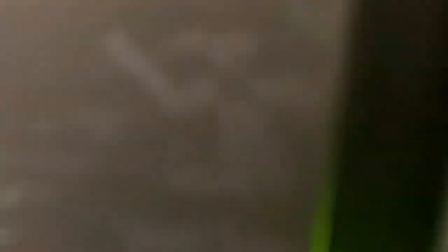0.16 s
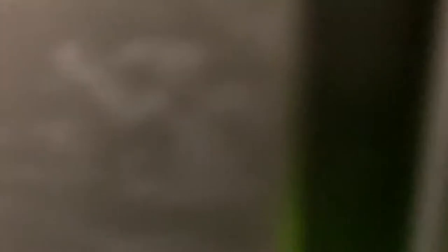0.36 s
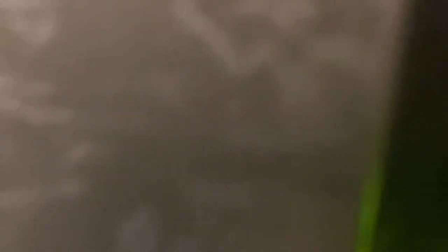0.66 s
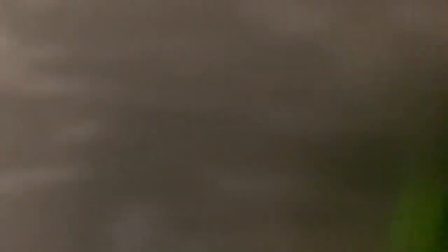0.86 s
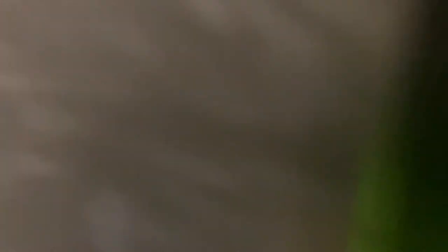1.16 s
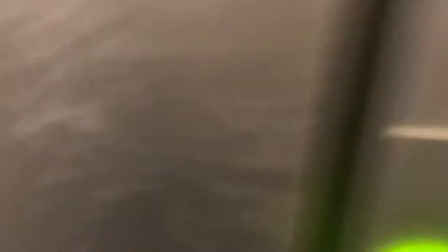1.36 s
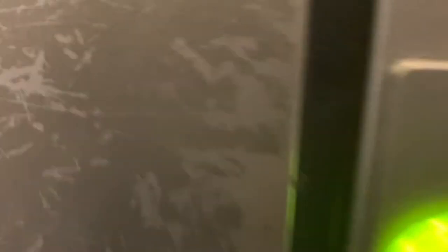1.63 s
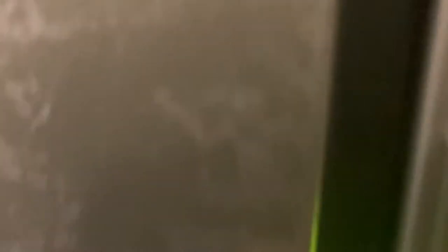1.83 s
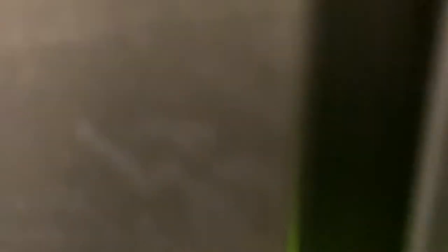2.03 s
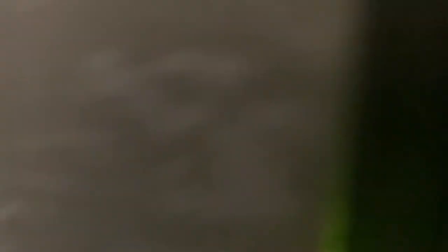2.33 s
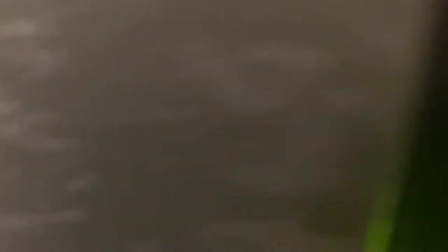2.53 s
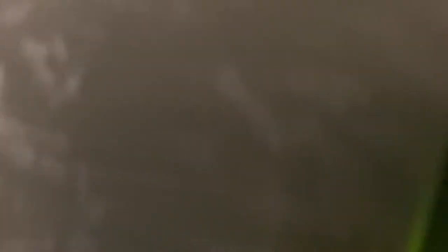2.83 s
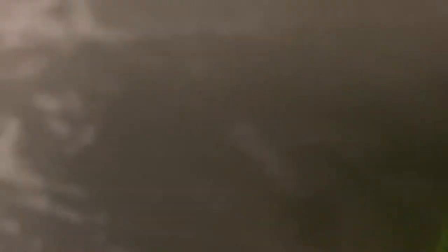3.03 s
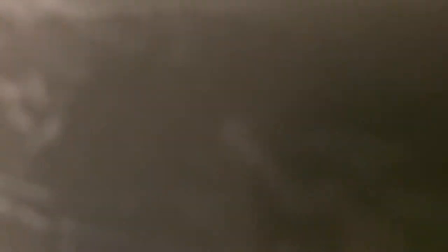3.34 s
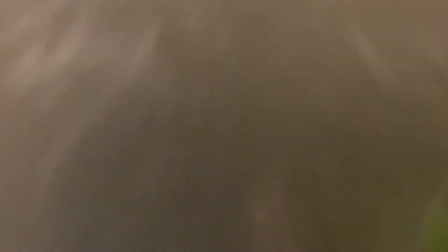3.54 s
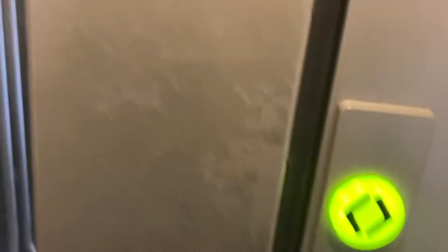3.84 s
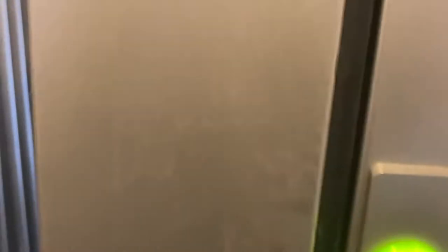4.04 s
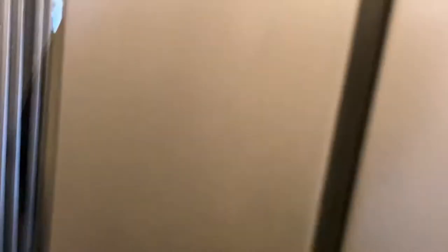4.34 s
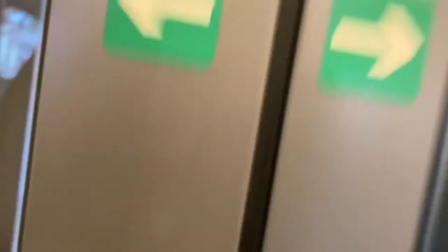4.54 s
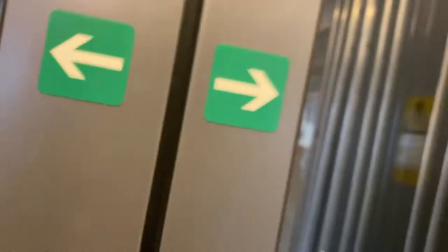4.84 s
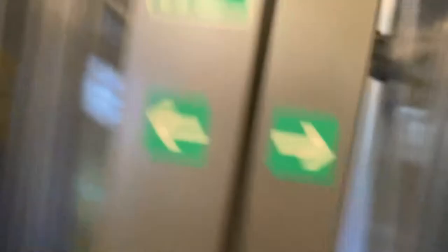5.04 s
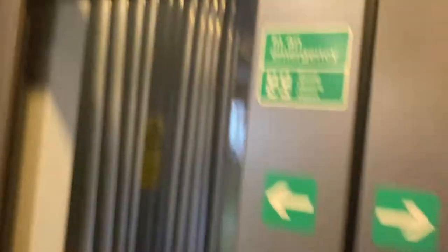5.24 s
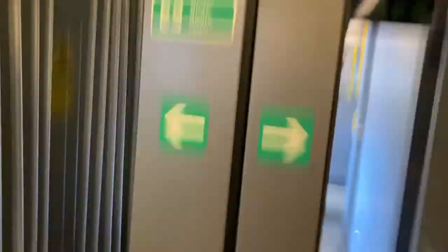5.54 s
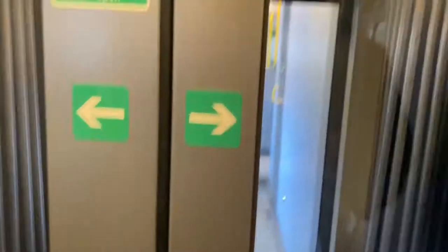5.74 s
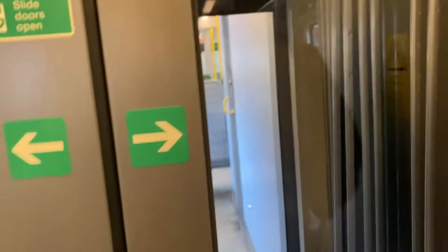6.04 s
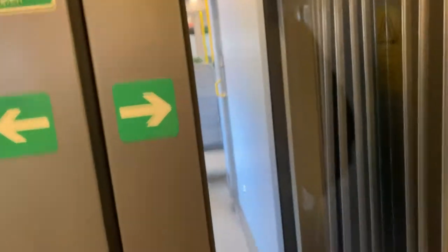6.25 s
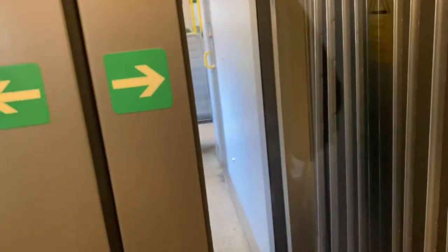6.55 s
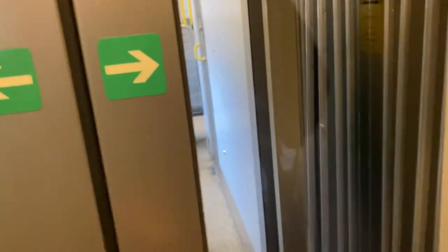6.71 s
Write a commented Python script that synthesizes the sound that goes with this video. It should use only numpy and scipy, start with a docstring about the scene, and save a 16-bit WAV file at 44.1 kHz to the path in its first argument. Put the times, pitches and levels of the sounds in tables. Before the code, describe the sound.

Inside a moving train, wheels rumble under occasional clicks until a sliding door jolts open to dense rubbery crackling and light hiss.

```python
"""A low rumble of train wheels comes through the floor, with the hum of the carriage, air and fans.
This is the small steel vestibule at the end of a moving passenger carriage, heard by a hand-held phone.
Door leaves click and knock in their tracks. After about four seconds the gangway door slides back:
more hiss comes in, and the rubber bellows creak, snap and crackle as their folds stick and slip."""
import sys
import numpy as np
from scipy import signal
from scipy.fft import rfft, irfft, next_fast_len
from scipy.io import wavfile
from scipy.ndimage import uniform_filter1d, map_coordinates

SR = 44100
rng = np.random.default_rng(int(sys.argv[2]) if len(sys.argv) > 2 else 0)


def transcribe(u):
    """Save the signal u as a 16-bit wav file named by the first command-line argument.

    u: samples, shape (n,) or (channels, n), limited to [-1, 1]; the rate is SR.
    q: integer samples, one column per channel.
    """
    v = np.clip(np.atleast_2d(u).T, -1, 1)
    q = np.round(v * 32767).astype(np.int16)
    wavfile.write(sys.argv[1], SR, q)


N = 303408
TIME_S = np.arange(N) / SR


def amp(db):
    """Turn decibels into a gain."""
    return 10 ** (np.asarray(db) / 20)


def unit(x):
    """Scale a signal to an average (rms) level of 1."""
    return x / np.sqrt(np.mean(x ** 2) + 1e-20)


def along(points, hz):
    """Read a table between its pitches, on an octave scale."""
    pitches, values = np.transpose(points)
    return np.interp(np.log(hz + 1), np.log(pitches + 1), values)


def curves(rows):
    """Join timed rows into one curve for each column after the time."""
    times, *columns = np.transpose(rows)
    return [np.interp(TIME_S, times, column) for column in columns]


def wobble(rate):
    """A smooth curve through `rate` random values a second."""
    coarse = np.arange(0, N + 32, 32)
    values = rng.standard_normal(int(N * rate / SR) + 4)
    return np.interp(np.arange(N), coarse, map_coordinates(values, [coarse * rate / SR]))


def filtered(x, response):
    """Multiply each frequency of x by response(hz)."""
    size = next_fast_len(N + SR // 2)
    return irfft(rfft(x, size) * response(np.fft.rfftfreq(size, 1 / SR)), size)[..., :N]


def band(x, lo_hz, hi_hz):
    """Keep one range of pitches, boosted so that white noise holds its level."""
    passed = signal.sosfilt(signal.butter(3, [lo_hz, hi_hz], "bandpass", fs=SR, output="sos"), x)
    return passed * np.sqrt(SR / 2 / (hi_hz - lo_hz))


# How alike left and right are: pitch_hz, likeness (0 to 1)
STEREO_LIKENESS = [(60, 0.97), (300, 0.9), (600, 0.66), (1000, 0.19), (1500, 0), (16000, 0)]
def rush(tone, patchy_db):
    """Noise from all around, shaped by a tone table, with random louder and softer patches."""
    noise = signal.stft(rng.standard_normal((2, N)), nperseg=512)[2]
    patches = uniform_filter1d(rng.standard_normal(noise.shape[1:]), size=6, axis=0)
    patches = uniform_filter1d(patches, size=10, axis=1)
    pair = signal.istft(noise * amp(patchy_db * unit(patches)), nperseg=512)[1][:, :N]
    width = lambda hz: np.arccos(along(STEREO_LIKENESS, hz)) / 2
    mid, side = filtered(pair, lambda hz: amp(along(tone, hz)) * [np.cos(width(hz)), np.sin(width(hz))])
    return unit(np.array([mid + side, mid - side]))


def door_blend():
    """An angle for fading from shut (0) to open (pi / 2) as the gangway door slides back."""
    start_s, end_s = 4.33, 5.29
    return np.interp(TIME_S, (start_s, end_s), [0, np.pi / 2])


# Tone of the wheels: pitch_hz, relative_db
WHEEL_TONE = [(13, -68), (25, -38), (40, -6), (65, 4), (90, 4.5), (124, -7.5), (150, -41), (200, -49),
              (330, -120)]
def wheel_rumble(level_db):
    """Rolling wheels rumble unevenly through the floor."""
    return amp(level_db + 2.6 * wobble(9.7)) * rush(WHEEL_TONE, patchy_db=0)


# Tone of the carriage body with the gangway shut, and open: pitch_hz, relative_db
BODY_SHUT_TONE = [(71, -6), (120, -3), (194, -2.5), (274, -9.5), (385, -3), (421, -5), (480, -11),
                  (504, -17.5), (541, -13), (653, -16.5), (806, -28.5), (1030, -25.5), (1300, -33.5),
                  (1690, -100), (2860, -120)]
BODY_OPEN_TONE = [(71, -17), (120, -1.5), (216, -16.5), (269, -15), (328, -26), (389, -14.5), (456, -9),
                  (926, -35), (1000, -39), (1300, -32), (1690, -47), (2860, -120)]
def body_drone(level_db):
    """The carriage body drones, changing tone as the gangway opens."""
    shut = np.cos(door_blend()) * rush(BODY_SHUT_TONE, patchy_db=2)
    opened = np.sin(door_blend()) * rush(BODY_OPEN_TONE, patchy_db=1.5)
    return amp(level_db + 0.89 * wobble(24)) * (shut + opened)


# Rise and fall of the ride noise: time_s, wheel_db, body_relative_db
RIDE_LEVELS = [(0.0, -32, -42), (0.77, -37.5, -40.5), (0.96, -29.5, -40), (1.28, -39, -46.5),
               (1.63, -36.5, -45.5), (1.84, -31, -40.5), (2.11, -41, -44), (2.28, -39.5, -45.5),
               (2.53, -37.5, -45), (2.91, -36.5, -41.5), (3.45, -35.5, -42), (3.62, -27.5, -40.5),
               (3.85, -37, -44.5), (4.85, -35, -43.5), (5.23, -37.5, -43), (5.75, -36.5, -44.5),
               (6.34, -36, -45), (6.59, -37.5, -45), (6.88, -33.5, -49)]
def ride():
    """Wheels and body swell and ease as the train runs."""
    wheel_db, body_db = curves(RIDE_LEVELS)
    return wheel_rumble(wheel_db) + body_drone(body_db + 3)


# Tone of the air: pitch_hz, relative_db
AIR_TONE = [(600, -4.5), (900, -9.5), (1500, -6.5), (2000, -6), (2380, -7), (2550, -6.5), (2780, -5.5),
            (3000, -12), (4000, -13), (6000, -16), (9000, -18.5), (12000, -15), (14000, -39), (15600, -28),
            (16200, -58)]
# Strength of the draught: time_s, relative_db
DRAUGHT_LEVELS = [(0.0, -64), (0.77, -62.5), (1.46, -61.5), (1.73, -57.5), (1.96, -65), (2.28, -64),
                  (3.2, -63), (3.37, -60.5), (3.6, -60), (4.2, -63.5)]
def air_hiss():
    """A draught hisses softly."""
    return amp(curves(DRAUGHT_LEVELS)[0] + 4 + 0.33 * wobble(5)) * rush(AIR_TONE, patchy_db=2)


# Notes of the fans: pitch_hz, level_db
FAN_NOTES = [(391, -54), (560, -61.5), (656.8, -60.5), (888.2, -68), (1040, -68.5), (1190, -69.5)]
def fan_hum():
    """Fans hum on a few notes that waver slightly, differently left and right."""
    out = np.zeros((2, N))
    for hz, db in FAN_NOTES:
        level = amp(db + 0.83 * np.array([wobble(23), wobble(7.7)]))
        phase = 2 * np.pi * hz * TIME_S + 450 / hz * wobble(11)
        out += level * np.sin(phase + [[0], [hz / 700]])
    return out


# Notes of the electrical gear: pitch_hz, level_db
POWER_NOTES = [(1997, -77), (2300, -86.5), (2498, -69.5), (2590, -76), (2998, -80)]
def power_whine():
    """The power gear gives a faint, high, wavering whine."""
    out = np.zeros((2, N))
    for hz, db in POWER_NOTES:
        level = amp(db + 2 * np.array([wobble(4), wobble(4)]))
        out += level * np.sin(2 * np.pi * hz * TIME_S + wobble(8) / 2)
    return out


def judder(rate):
    """Stick and slip: a gain that jumps about `rate` times a second and quickly sinks again."""
    slips = (rng.random(N + SR) < rate / SR) * amp(4.3 * np.minimum(rng.exponential(size=N + SR), 2.6))
    sink = amp(-60 * np.arange(SR // 20) / SR / .012)
    return unit(signal.fftconvolve(slips, sink)[:N])


# Timing shared by all snaps. Here and below, fade_s is the time to die away by 60 dB.
LEAD_SAMPLES, RISE_S = SR // 50, 0.0008
SNAP_TIME_S = (np.arange(SR // 8) - LEAD_SAMPLES) / SR
SNAP_RISE, AFTER_PEAK_S = np.clip(SNAP_TIME_S / RISE_S, 0, 1), np.maximum(SNAP_TIME_S - RISE_S, 0)
def crack(fade_s=0.0035):
    """Stuck surfaces break free with a tiny burst of noise."""
    noise = rng.standard_normal((3, len(SNAP_TIME_S)))  # shared, left, right
    burst = SNAP_RISE ** 3 * amp(-60 * AFTER_PEAK_S / fade_s) * (noise[0] + 0.7 * noise[1:])
    burst[:, LEAD_SAMPLES + round(RISE_S * SR) + np.arange(2)] += [8, -3]  # the break itself
    return 1.83 * burst / np.linalg.norm(burst)


def scrape(fade_s):
    """The surfaces start to creep just before the crack, then slide to a stop."""
    creep = amp(-12 + 60 * np.minimum(SNAP_TIME_S, 0) / 0.01) * (1 - SNAP_RISE)
    slide = SNAP_RISE * amp(-60 * (AFTER_PEAK_S / max(fade_s, .01)) ** 1.12)  # holds, then stops short
    return (creep + slide) * rng.standard_normal((2, len(SNAP_TIME_S)))


# Notes the frame rings with: pitch_hz, relative_db, fade_s
FRAME_NOTES = [(540, 7.5, 0.035), (904, -6, 0.02), (1305, 0, 0.015), (1728, -4, 0.014), (1857, -2.5, 0.014),
               (2220, -1.5, 0.013), (2810, -9.5, 0.012), (3700, -9, 0.0068), (4240, -1.5, 0.011),
               (4776, 1.5, 0.0073), (5940, -4, 0.0034), (6900, -4, 0.009), (7400, -1, 0.011)]
def frame_ring(favoured_hz, shares_db):
    """A snap makes the frame ring briefly, most strongly near one favoured pitch."""
    hz, db, fade_s = np.transpose(FRAME_NOTES)
    strike_db = np.interp(hz, [1500, 3500, 8000], shares_db) - 18 * np.abs(np.log2(hz / favoured_hz))
    strike_db += 2.5 * rng.standard_normal(len(hz))
    hz = hz * (1 + .012 * rng.standard_normal(len(hz)))  # the folds sit differently each time
    notes = np.sin(2 * np.pi * hz[:, None] * np.maximum(SNAP_TIME_S, 0))
    ring = SNAP_RISE * (amp(db + strike_db) @ (amp(-60 * AFTER_PEAK_S / fade_s[:, None]) * notes))
    lag = round(rng.normal(0, .0003) * SR)  # each comes from its own direction
    return np.array([ring, np.roll(ring, lag)])


# Door clicks and bellows snaps (levels are relative):
# start_s, level_db, dull_db, bright_db, favoured_hz, scrape_db, scrape_fade_s, left_over_right_db
CLICKS_AND_SNAPS = [(0.312, -41, -4, -8.5, 1490, -17.5, 0.058, 3),
                    (0.441, -42.5, -18, -11, 816, -13.5, 0.094, -1),
                    (0.836, -19, -37, -2, 6740, -30, 0.068, -3),
                    (0.9305, -9.5, -11, -11, 4760, -19, 0.02, 4),
                    (0.9318, -27, 3.5, -20, 900, -29, 0.033, -2),
                    (0.9359, -24.5, 2.5, 7, 1700, -46, 0.023, -1.5),
                    (0.9424, -28, -18, -9, 7100, -24, 0.03, -1),
                    (1.254, -53.5, -20, -2.5, 5800, -16, 0.047, -2),
                    (1.276, -43, -14, -12, 802, -15, 0.07, -5),
                    (1.3481, -24, -13, -6, 3800, -21.5, 0.067, -1),
                    (1.6261, -21, -14.5, -9.5, 3550, -16.5, 0.031, -4),
                    (2.0193, -48, -12, -10, 1180, -16.5, 0.074, 1),
                    (3.032, -53, 3, -0.5, 914, -17, 0.054, 4),
                    (3.2024, -13.5, -2, -6.5, 4600, -15.5, 0.0076, 0.5),
                    (3.2202, -34, -3, -20, 1260, -23, 0.046, -2),
                    (3.3842, -52.5, -1, -22, 1020, -8.5, 0.056, 1.0),
                    (3.4225, -32, -1.5, -7.5, 940, -19.5, 0.043, -4),
                    (3.488, -43, 2, -16, 990, -30, 0.043, -3), (3.58, -57, 4, -16, 1000, -23, 0.044, -8),
                    (3.8096, -17, -12, -6.5, 2100, -18, 0.041, 0.5),
                    (4.367, -37, -9, -5.5, 1030, -11.5, 0.15, -4),
                    (4.3968, -12.5, -7, -9, 1210, -15, 0.067, 0),
                    (4.4257, -25.5, 1.5, -11, 1260, -15, 0.19, -3),
                    (4.4993, -14, -11, -5.5, 1930, -13.5, 0.032, -1),
                    (4.5313, -14.5, -15, -11, 1000, -9.5, 0.052, -2.5),
                    (4.5549, -13.5, -16.5, -8.5, 1920, -10, 0.05, 0.5),
                    (4.5612, -12, -10.5, -4.5, 3600, -13.5, 0.067, -1.5),
                    (4.615, -21, -7, -17, 3640, -18, 0.081, 0),
                    (4.6372, -20.5, 0, -7, 925, -22.5, 0.041, -6.5),
                    (4.66, -30.5, -1, -9, 1850, -16, 0.06, 0),
                    (4.678, -20.5, -13, -8.5, 885, -20.5, 0.07, -4),
                    (4.707, -15, -20, -9.5, 4200, -24, 0.099, 1),
                    (4.7486, -23, -11, -2.5, 864, -16, 0.11, -3),
                    (4.768, -18, -11, -21, 1730, -24, 0.071, 0),
                    (4.7854, -5.5, -13, -13, 2650, -19.5, 0.046, -3),
                    (4.8334, -18.5, -26, -9, 1460, -14.5, 0.044, 0),
                    (4.8613, -13.5, -4.5, -16, 2930, -29, 0.071, -6.5),
                    (4.881, -21, -9, -8.5, 1560, -15, 0.16, -2),
                    (4.9074, -17, -18, -9.5, 1260, -14, 0.047, -2),
                    (4.9706, -22, -3.5, -8.5, 1620, -13.5, 0.11, -0.5),
                    (4.9785, -30, -12, -2, 3600, -16, 0.046, 4),
                    (5.002, -20, -15, -8.5, 1280, -18, 0.068, -2),
                    (5.053, -38, -16, -2, 6630, -14, 0.054, -2),
                    (5.0745, -26, -12, -12, 4650, -15.5, 0.12, -2),
                    (5.096, -37, -20, -5, 5900, -15.5, 0.04, 0),
                    (5.1122, -26.5, -8.5, -11, 2800, -11, 0.043, -5),
                    (5.1493, -30, -8, -18, 4540, -12, 0.051, 8),
                    (5.1609, -26.5, -7, -10, 3300, -15.5, 0.15, -13),
                    (5.1734, -14.5, -5, -7, 2060, -19, 0.075, 0),
                    (5.211, -37.5, 1, -21, 1580, -14, 0.05, -2),
                    (5.267, -26, -3.5, -8.5, 1990, -12, 0.066, 0),
                    (5.281, -28.5, -19, -11, 5270, -10.5, 0.077, -5),
                    (5.314, -35, -10, -7, 1900, -14, 0.05, 2), (5.3637, -40, -23, -6, 6740, -14, 0.038, 0),
                    (5.374, -35, -7, -16, 2000, -18, 0.04, 0),
                    (5.3892, -21.5, -6, -7, 2260, -18.5, 0.13, -3),
                    (5.4248, -31, -22, -7, 2730, -11.5, 0.052, -1),
                    (5.468, -27.5, -4.5, -7.5, 2290, -11, 0.051, -2.5),
                    (5.4865, -32.5, -6, -10, 1280, -11.5, 0.072, 1),
                    (5.535, -37.5, -1, -4, 2250, -19, 0.036, -6),
                    (5.5586, -31, -5.5, -11, 1950, -13, 0.036, 1),
                    (5.5737, -30.5, -11, -12, 829, -16.5, 0.18, 1),
                    (5.599, -31, -7, -16, 3600, -9, 0.078, -1),
                    (5.608, -19.5, -6.5, -22, 1480, -20, 0.1, 0),
                    (5.6138, -13, -10, -8, 3570, -17.5, 0.13, 0.5),
                    (5.6383, -16, -9, -2, 4460, -19, 0.038, -1.5),
                    (5.648, -24, -8, -21, 1900, -15, 0.05, -4),
                    (5.675, -25.5, -10, -14, 1670, -15, 0.05, 2),
                    (5.684, -27.5, -5.5, -7, 1900, -19, 0.072, -1),
                    (5.7208, -33, -5, -20, 1290, -16, 0.03, 0),
                    (5.7258, -38.5, -14, -6.5, 1230, -2.5, 0.075, 0),
                    (5.7638, -20.5, -7, -18, 5900, -15.5, 0.073, -3),
                    (5.773, -21.5, -11, -9.5, 1890, -22, 0.15, -6.5),
                    (5.824, -21, -13.5, -17, 1490, -21, 0.043, -1),
                    (5.8464, -10, -11, -8.5, 2400, -18, 0.063, -1),
                    (5.875, -32, -2.5, -12, 2250, -11, 0.072, -2),
                    (5.901, -17, -16, -5.5, 2120, -16, 0.088, 1),
                    (5.957, -30, -15, -14, 4900, -7.5, 0.043, -4),
                    (5.9646, -21.5, -5.5, -4.5, 2420, -21, 0.022, 5),
                    (6.0352, -33, -8, -22, 2800, -17, 0.054, -2),
                    (6.056, -41.5, -3, -17, 1260, -11, 0.072, -1),
                    (6.0844, -14, -20, -8, 3100, -21, 0.13, -1),
                    (6.117, -19.5, -15, -9, 1690, -17.5, 0.084, -3),
                    (6.134, -21.5, -20, -3, 2840, -21, 0.063, 3),
                    (6.1453, -22.5, -2.5, -14, 1620, -14.5, 0.033, 0),
                    (6.1599, -16.5, -16, -8, 2360, -26, 0.028, 5),
                    (6.1746, -18.5, -19, -7, 1950, -20.5, 0.057, 3),
                    (6.1863, -27, -3.5, -16, 1400, -19, 0.19, 1),
                    (6.208, -31.5, -5, -13.5, 1630, -13.5, 0.069, -7),
                    (6.252, -38.5, -3, -20, 1380, -11.5, 0.13, 2),
                    (6.263, -36, -1, -20, 2200, -14, 0.08, -2), (6.289, -36, -3, -20, 1900, -16, 0.08, 0),
                    (6.333, -35, -1, -18, 2010, -26, 0.04, 1), (6.3608, -32, -12, -19, 2020, -22, 0.04, 7),
                    (6.3965, -21, -15, -9.5, 2160, -20.5, 0.049, 0.5),
                    (6.438, -20.5, -4.5, -15, 2280, -12.5, 0.036, 0.5),
                    (6.457, -25.5, -18, -8, 5900, -10, 0.054, 1),
                    (6.5185, -40, -15, -17, 2300, -9, 0.036, -3),
                    (6.542, -33.5, -5, -10, 2440, -17.5, 0.034, 2),
                    (6.6165, -17.5, -2, -9.5, 2020, -13.5, 0.021, -1),
                    (6.713, -47, 3, -12, 2300, -17, 0.04, 4),
                    (6.8115, -21.5, -10, -0.5, 1120, -23, 0.051, 3),
                    (6.8319, -16.5, -14, -14.5, 2200, -18, 0.041, -4)]
def snaps():
    """Each click or snap is a crack and a juddering scrape in four pitch ranges, plus the frame's ring."""
    parts = np.zeros((5, 2, N + SR))
    grip = np.pad(judder(rate=350) * 0.83 + 0.56, (0, SR))
    for start_s, db, dull_db, bright_db, favoured_hz, scrape_db, fade_s, pan_db in CLICKS_AND_SNAPS:
        first = round(start_s * SR) - LEAD_SAMPLES
        span = slice(first, first + len(SNAP_TIME_S))
        snap = crack() + amp(scrape_db) * grip[span] * scrape(fade_s)
        sides = amp(db + np.array([[pan_db / 2], [-pan_db / 2]]))
        shares_db = [dull_db + 9.5, 0, bright_db + 9.5]  # dull, middle, bright
        low_db = shares_db[0] - 4 * max(np.log2(favoured_hz / 1000), 0)  # higher snaps have less bass
        parts[:4, :, span] += amp([low_db, *shares_db])[:, None, None] * sides * snap
        parts[4, :, span] += sides * frame_ring(favoured_hz, shares_db)
    low, dull, middle, bright, rings = parts[..., :N]
    return amp(2) * (amp(-4.5) * band(low, 305, 1200) + amp(-4) * band(dull, 1270, 2590)
                     + band(middle, 2640, 7310) + band(bright, 6235, 12240) + amp(-5.5) * rings)


# Low knocks through the floor and door: start_s, level_db, pitch_hz, swell_s, fade_s
PANEL_KNOCKS = [(0.319, -20.5, 165, 0.0067, 0.097), (0.667, -19, 164, 0.0016, 0.029),
                (0.9312, -13.5, 478, 0.00091, 0.023), (0.9322, -14.5, 847, 0.00036, 0.017),
                (0.932, -12, 176, 0.0015, 0.05), (1.094, -12.5, 185, 0.0028, 0.028),
                (1.85, -21, 176, 0.004, 0.045), (1.894, -15.5, 169, 0.0028, 0.035),
                (3.203, -17, 204, 0.00025, 0.022), (3.204, -16, 515, 0.00056, 0.02),
                (3.581, -22, 142, 0.005, 0.11), (4.399, -14, 200, 0.0059, 0.046),
                (4.423, -8.5, 170, 0.0038, 0.041), (4.445, -3.5, 194, 0.015, 0.053),
                (4.525, -15.5, 90, 0.011, 0.12), (4.6372, -19, 870, 0.0006, 0.031),
                (4.964, -2, 113, 0.024, 0.075)]
def knocks():
    """Each knock rings a panel: a low note with a weaker, shorter overtone."""
    out, t = np.zeros(N + SR), np.arange(SR // 2) / SR
    for start_s, db, hz, swell_s, fade_s in PANEL_KNOCKS:
        swell = 1 - np.exp(-t / max(swell_s, .0003))
        fade = amp(-60 * t / fade_s)
        note = np.sin(2 * np.pi * hz * t) + 0.26 * fade * np.sin(2 * np.pi * 2.47 * hz * t)
        out[round(start_s * SR):][:len(t)] += amp(db) * swell * fade * note
    return out[:N]


# Tone of the rubber: pitch_hz, relative_db
RUBBER_TONE = [(300, -1), (700, -3.5), (2000, 0.5), (3500, -1), (6000, -6), (10000, -3), (13000, -5),
               (15500, -21), (17000, -28)]
def rubber_crackle(count=1500):
    """Rubber folds let go in many tiny slips that echo in the room, over a soft rub."""
    when, pitch, size, left, lag = rng.random((count, 5)).T[:, :, None]
    hz, t = 700 * 12.5 ** pitch, np.arange(400) / SR
    size_db = -5.5 * np.maximum(np.log(size + 1e-9), -3.2)  # many small, a few large
    ticks = amp(size_db - 60 * t * hz / 18) * np.sin(2 * np.pi * hz * t)  # gone in 18 cycles
    places = (when * N).astype(int) + np.arange(len(t))
    slips = np.array([np.bincount((places + delay).ravel(), (ticks * np.sqrt(share)).ravel(), N)[:N]
                      for share, delay in [(left, 0), (1 - left, (30 * lag).astype(int))]])
    slips = unit(filtered(slips, lambda f: amp(along(RUBBER_TONE, f))))
    rub = unit(amp(2 * wobble(30)) * (judder(rate=500) + .4) * rush(RUBBER_TONE, patchy_db=1.8))
    return amp(-8) * (slips + amp(1.5) * room_echo(slips)) + amp(-4.5) * rub


# Soft brushing: peak_s, relative_db, rise_s, fall_s
SOFT_BRUSHES = [(1.72, -51.5, .07, 0.12), (1.855, -56, .05, 0.066)]
# How hard the bellows flex: time_s, relative_db
FLEX_LEVELS = [(4.28, -59), (4.36, -44.5), (4.42, -37.5), (4.53, -33.5), (4.58, -39.5), (4.68, -40),
               (4.82, -34.5), (5.18, -46), (5.39, -47), (5.77, -40), (5.9, -47), (6.31, -47), (6.59, -57.5),
               (6.88, -64)]
def bellows():
    """The rubber brushes softly twice, then crackles in waves as the bellows flex."""
    moves = [[(peak_s - rise_s, db - 13), (peak_s, db), (peak_s + fall_s, db - 23)]
             for peak_s, db, rise_s, fall_s in SOFT_BRUSHES]
    level = np.zeros(N)
    for rows in (*moves, FLEX_LEVELS):
        silent_before, silent_after = (rows[0][0] - .05, -110), (rows[-1][0] + .05, -110)
        level += amp(curves([silent_before, *rows, silent_after])[0])
    return level * rubber_crackle()


# Tone of the air in the gangway: pitch_hz, relative_db
GANGWAY_TONE = [(500, -13), (1200, -16), (3000, 2), (6000, -5), (10000, -1), (13000, -4), (16000, -19)]
def gangway_hiss():
    """Hiss comes in through the door as it opens."""
    return amp(-58) * np.sin(door_blend()) * rush(GANGWAY_TONE, patchy_db=-5.5)


def door_jolt(start_s=4.4, level_db=-28, hold_s=.065, fade_s=.07):
    """The door lets go and its panel gives a short, low shudder."""
    t = TIME_S - start_s
    shape = np.clip(t / 0.0031, 0, 1) * amp(level_db - 60 * np.maximum(t - hold_s, 0) / fade_s)
    return band(shape * rng.standard_normal(N), 160, 480)


# How long the vestibule echoes: pitch_hz, fade_s
ROOM_FADES = [(300, 0.21), (2000, 0.092), (6000, 0.096), (12000, 0.096)]
def room_echo(x):
    """The small steel room echoes briefly; low pitches last longest."""
    hz, t, noise = signal.stft(rng.standard_normal((2, SR // 3)), SR, nperseg=256)
    tail = signal.istft(noise * amp(-60 * t / along(ROOM_FADES, hz)[:, None]), SR, nperseg=256)[1]
    delayed = np.pad(x, ((0, 0), (130, 0)))  # about 3 ms
    return signal.fftconvolve(delayed, tail / np.linalg.norm(tail[0]), axes=1)[:, :N]


def scene():
    """The running train, with the door and bellows sounds and their echo on top."""
    clicks, thuds = snaps(), knocks() + door_jolt()
    background = ride() + air_hiss() + fan_hum() + power_whine() + gangway_hiss()
    return background + bellows() + clicks + thuds + room_echo(amp(-11.5) * clicks + amp(-11) * thuds)


# Tone of the phone's microphones: pitch_hz, gain_db
PHONE_TONE = [(20, 2.5), (15500, -1), (16000, -8), (16900, -22)]
def record(dry):
    """The phone feeds both sides mostly the same high treble, and cuts off the very top."""
    top_hz = 16900
    colour = lambda hz: amp(along(PHONE_TONE, hz)) * (hz < top_hz)
    shared = lambda hz: np.clip((hz - 6000) / 1100, 0, .93)
    # The shared treble reaches the left about a quarter of a millisecond late.
    late = lambda hz: np.exp(np.pi * 1j * (hz - 7000) / 4280 * np.array([[-1], [1]]))
    separate = filtered(dry, lambda hz: colour(hz) * np.sqrt(1 - shared(hz) ** 2))
    mono = dry.sum(axis=0) / np.sqrt(2)
    return separate + filtered(mono, lambda hz: colour(hz) * shared(hz) * late(hz))


dry = scene()
out = record(dry)
transcribe(out)
```